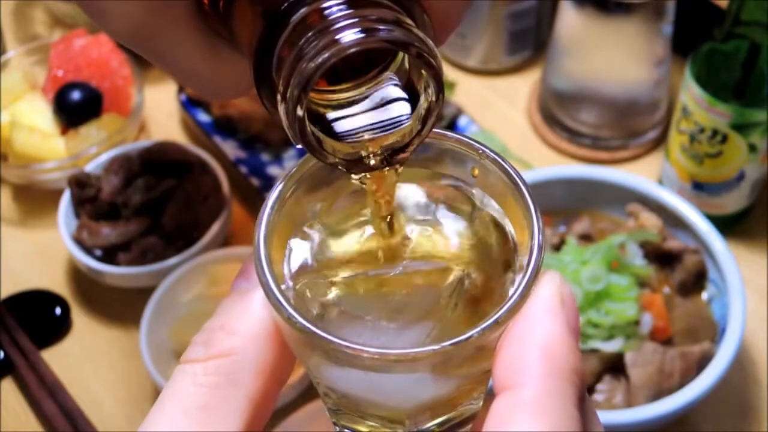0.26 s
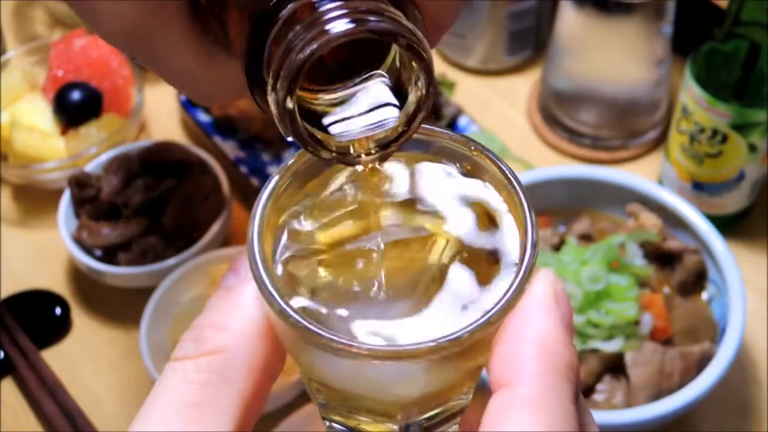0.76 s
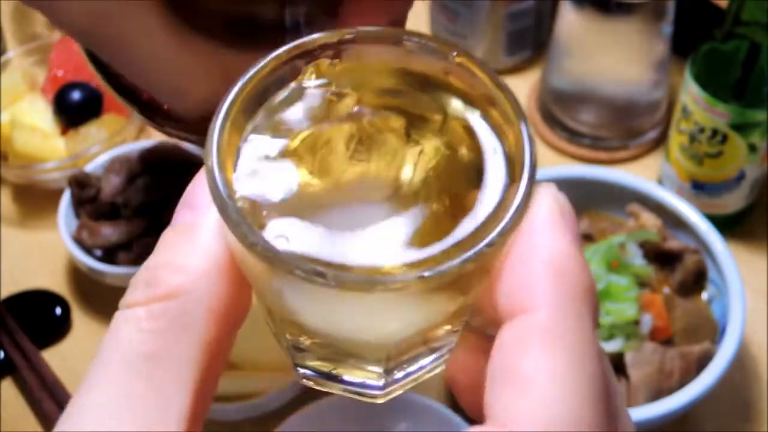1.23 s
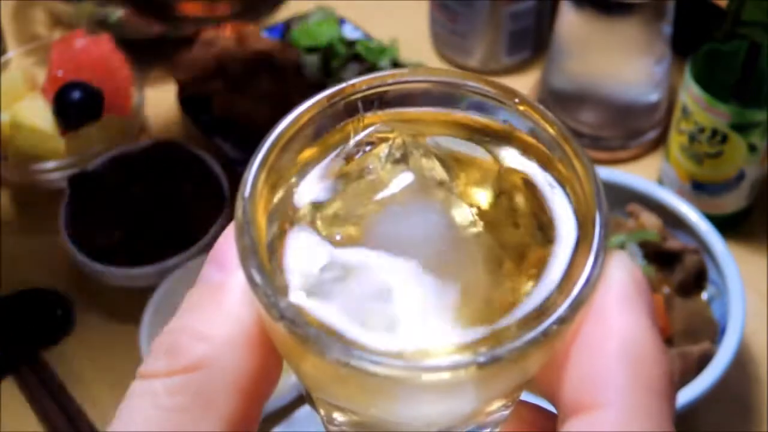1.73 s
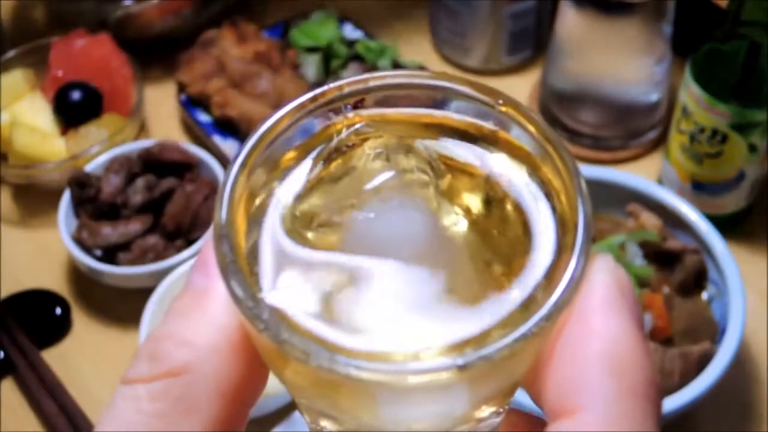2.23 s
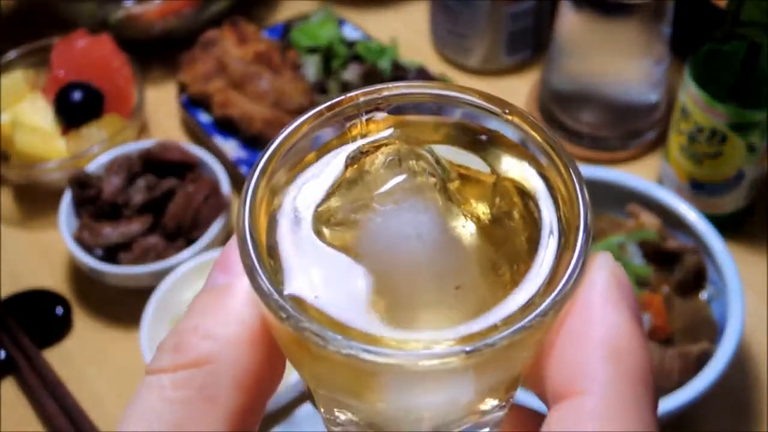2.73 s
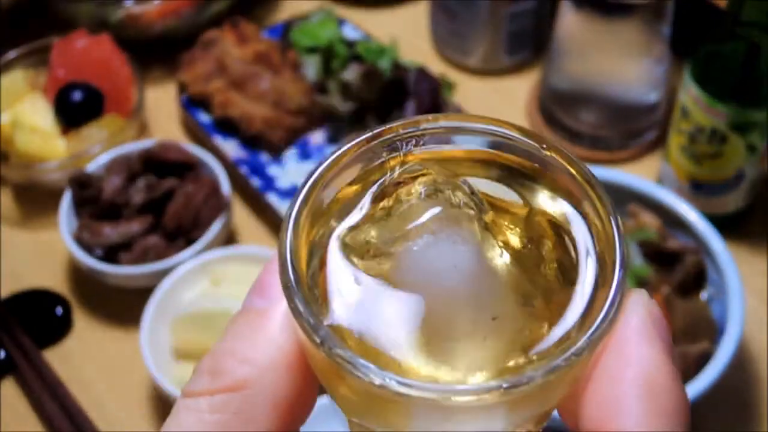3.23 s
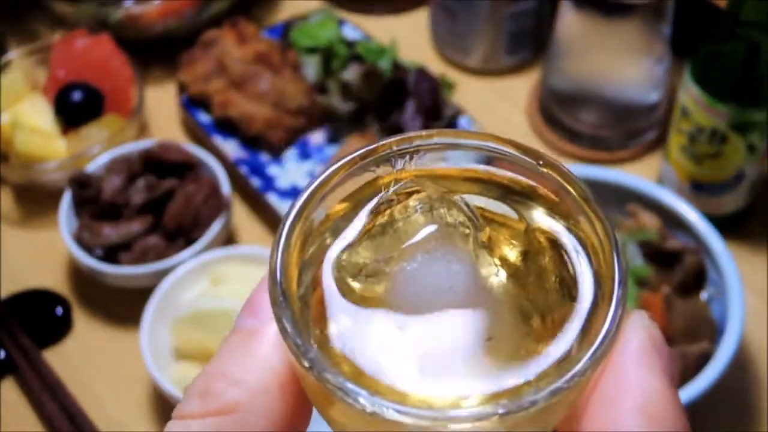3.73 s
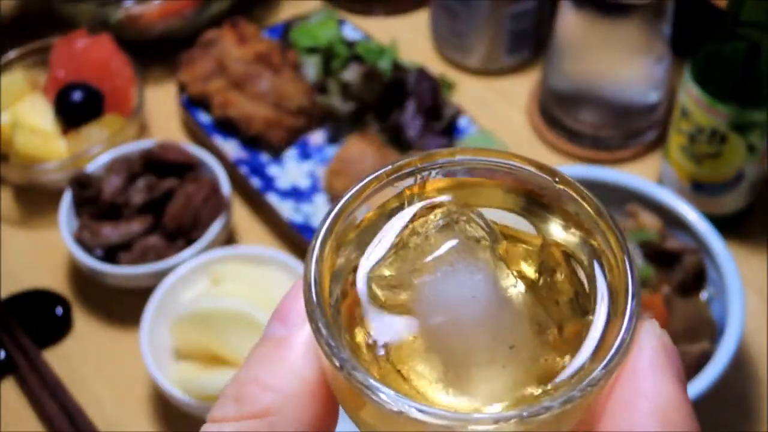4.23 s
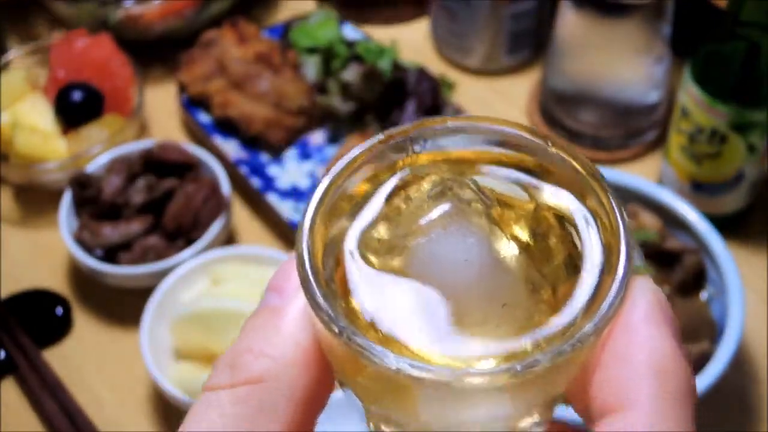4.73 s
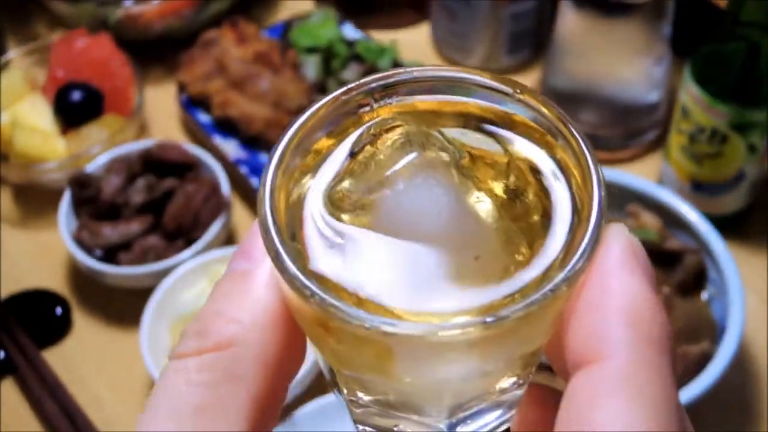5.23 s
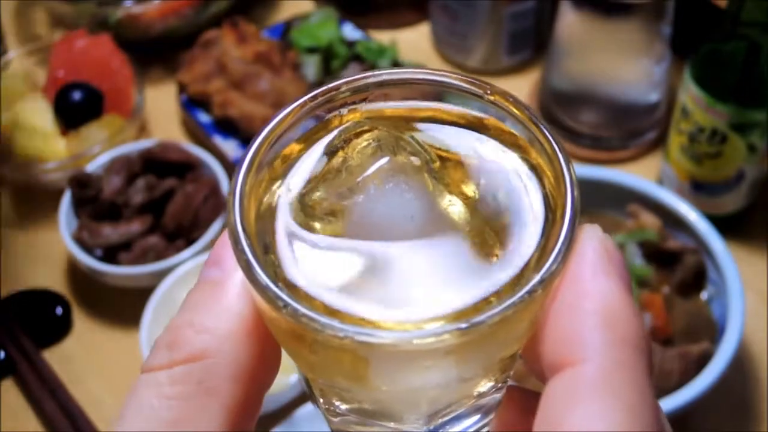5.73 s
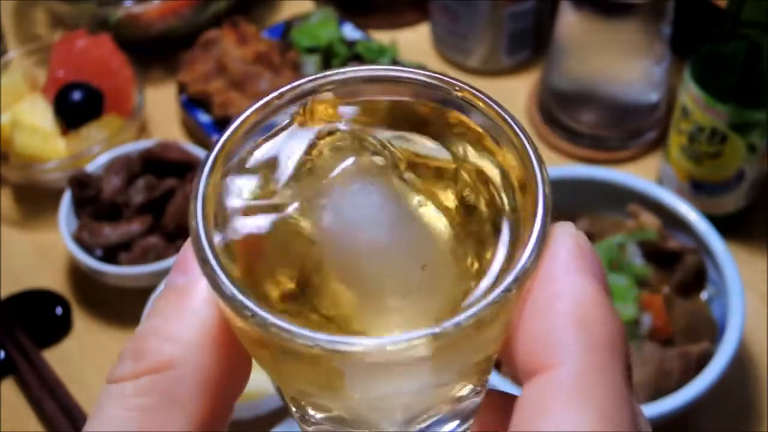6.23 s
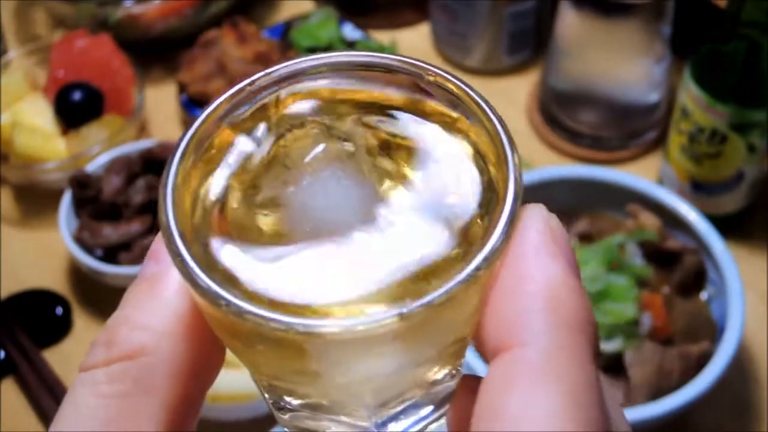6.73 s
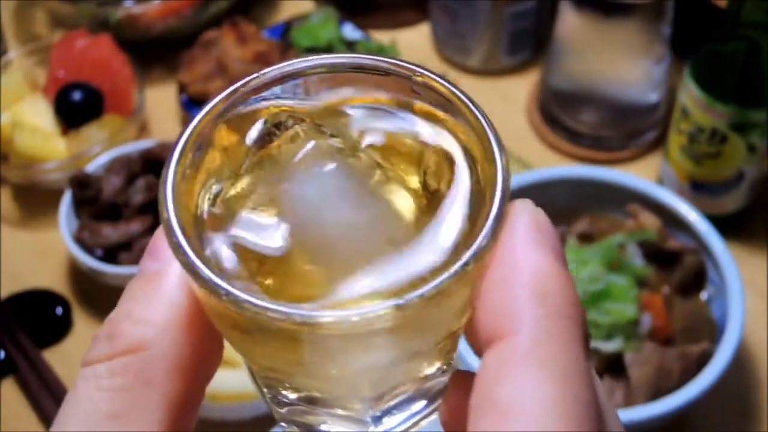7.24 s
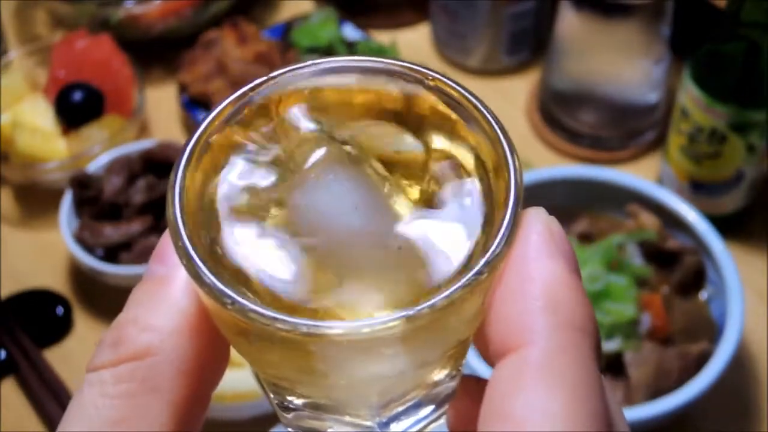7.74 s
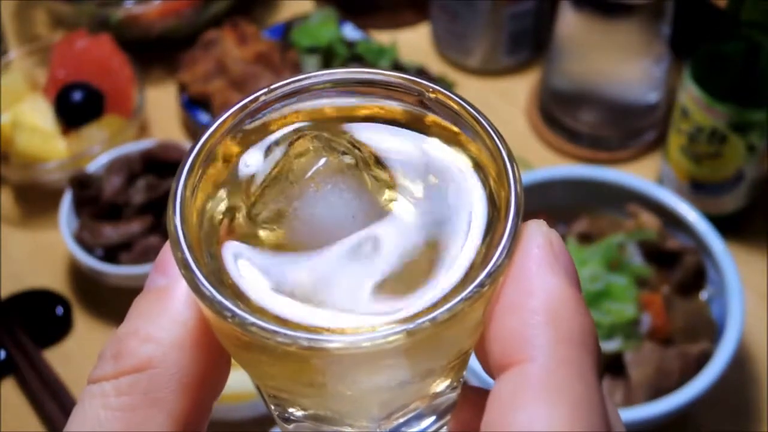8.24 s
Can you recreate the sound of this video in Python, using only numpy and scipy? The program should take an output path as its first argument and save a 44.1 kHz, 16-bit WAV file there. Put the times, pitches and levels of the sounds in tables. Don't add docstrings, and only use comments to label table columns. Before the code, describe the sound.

Three hollow glugs, a burst of bubbly pops, two heavy bottle knocks on wood with rattling dishes, cap screwing, then delicate ice ticks.

```python
import sys
import numpy as np
from scipy import signal
from scipy.fft import rfft, irfft, next_fast_len
from scipy.io import wavfile
from scipy.ndimage import uniform_filter1d

SR = 44100
rng = np.random.default_rng(int(sys.argv[2]) if len(sys.argv) > 2 else 0)


def master_out(mix):
    frames = np.transpose(np.atleast_2d(mix))
    ceiling = np.clip(frames, -1, 1)
    pcm = np.round(ceiling * 32767).astype(np.int16)
    wavfile.write(sys.argv[1], SR, pcm)


def linear_from_db(decibels):
    return 10 ** (np.asarray(decibels, float) / 20)


N = 373527


def at_hz(points, hz):
    table_hz, value = np.array(points).T[:2]
    return np.interp(np.log(hz + 1), np.log(table_hz), value)


def add(out, s, piece):
    i = round(s * SR)
    out[..., i:i + piece.shape[-1]] += piece[..., :N - i]


def fade(length, t60, swell):
    t = np.arange(round(length * SR)) / SR
    return t, (1 - np.exp(-t / max(swell, 1e-4))) * linear_from_db(-60 * t / max(t60, 1e-3))


def noise(size, spectrum, likeness, low_hz=0, high_hz=1e5):
    hz = np.fft.rfftfreq(size, 1 / SR)
    mid, side = rfft(rng.standard_normal((2, size)))
    alike = np.clip(at_hz(likeness, hz), 0, 1)
    pair = np.sqrt(1 + alike) * mid + np.sqrt(1 - alike) * side * [[1], [-1]]
    pair = linear_from_db(at_hz(spectrum, hz)) * pair
    pair /= np.sqrt(2 * np.mean(np.sum(np.abs(pair) ** 2, axis=1))) / size
    return irfft(pair * ((hz >= low_hz) & (hz < high_hz)), size)


def rings(rows):
    out = np.zeros(N)
    for s, hz, db, t60, swell in rows:
        t, shape = fade(0.33, t60, swell)
        add(out, s, -linear_from_db(db) * shape * np.sin(2 * np.pi * hz * t))
    return out


def climbs(rows, bend, change_db):
    out = np.zeros(N)
    for s, length, from_hz, to_hz, db in rows:
        share = np.arange(round(length * SR)) / (length * SR)
        phase = 2 * np.pi * np.cumsum(from_hz * (to_hz / from_hz) ** share ** bend) / SR
        ends = np.clip(np.minimum(share, 1 - share) / 0.021, 0, 1)
        add(out, s, linear_from_db(db + change_db * share) * ends * np.sin(phase))
    return out


def click(db, t60):
    shape = fade(.02, t60, 0.0001)[1]
    return linear_from_db(db) * shape * np.diff(rng.standard_normal(len(shape) + 1)) / 2


# [f/Hz, level/dB per Hz]
HISS_COLOUR = [(12, -4), (20, 1.5), (86, -6), (116, -4.5), (186, -8.5), (305, -7.5), (401, -11), (942, -13),
               (1270, -16.5), (1380, -17.5), (3730, -22), (6120, -24), (6830, -24), (7830, -25),
               (14400, -24.5)]
# [f/Hz, likeness 0..1]
HISS_LIKENESS = [(60, 0.73), (150, 0.56), (370, 0.293), (940, 0.42), (2340, 0.096), (5840, 0.03),
                 (14600, 0.018)]


def hiss():
    return linear_from_db(-50) * noise(next_fast_len(N), HISS_COLOUR, HISS_LIKENESS, 0, 14330)[:, :N]


def limiter_gain(x):
    limit, duck_db, look_ahead_s, ease_s, recover_db_per_s = .6, 28, 0.0092, 0.0097, 400
    climb = recover_db_per_s * np.arange(N) / SR
    held = np.maximum.accumulate(duck_db * (np.abs(x).max(axis=0) > limit) + climb) - climb
    ahead = np.roll(held, -round(look_ahead_s * SR))
    return linear_from_db(-uniform_filter1d(ahead, round(ease_s * SR)))


def room(x):
    t60_s, wall_cut_hz = 0.11, 4800
    size = next_fast_len(N + SR)
    w = 2 * np.pi * np.fft.rfftfreq(size)
    dull = 1 / (1 + 1j * w * SR / (2 * np.pi * wall_cut_hz))
    answer = []
    for side in rng.uniform(0.006, 0.014, (2, 8)) * SR:
        loops = [linear_from_db(-60 * lag / SR / t60_s) * dull * np.exp(-1j * w * lag) for lag in side]
        answer.append(sum((-1) ** k * g / (1 - g) for k, g in enumerate(loops)))
    return irfft(rfft(x, size) * np.array(answer), size)[:, :N]


# [f/Hz, likeness 0..1]
NEAR_LIKENESS = [(200, 1), (2000, 0.96), (6000, 0.79), (14000, 0.85)]
# [f/Hz, level/dB per Hz]
STREAM_COLOUR = [(30, -22), (60, -4), (100, 5), (160, -12), (400, -40)]
# [t/s, peak/dB]
THUDS = [
    (0.0, -57),
    (.116, -54.5),
    (.334, -51),
    (.556, -56),
    (.636, -63),
]


def stream():
    rise_db_per_s, fall_db_per_s = 170, 140
    t, out, shape = np.arange(SR) / SR, np.zeros((2, N)), 0
    for s, db in THUDS:
        shape = shape + linear_from_db(db + np.minimum(rise_db_per_s * (t - s), fall_db_per_s * (s - t)))
    add(out, 0, shape * noise(SR, STREAM_COLOUR, NEAR_LIKENESS))
    return out


def stroke(attack, hold, t60):
    t = np.arange(SR // 2) / SR
    return np.clip(t / attack, 0, 1) * linear_from_db(-60 * np.clip(t - attack - hold, 0, None) / t60)


# [f/Hz, level/dB per Hz]
BRUSH_COLOUR = [(59, -44), (100, -25), (155, 4.5), (443, -4), (797, -6.5), (5480, -10), (11200, -5.5),
                (14100, -4.5), (15000, -40)]
# [f/Hz, likeness 0..1]
BRUSH_LIKENESS = [(60, 0.41), (240, 0.68), (940, 1), (3690, 1), (14600, 0.11)]
# [t/s, attack/s, hold/s, level/dB, brightness/dB]
BRUSHES = [
    (6.631, 0.0032, 0.027, -42, 3),
    (6.775, 0.012, 0.018, -44.5, -12),
]


def brush():
    split_hz = 2000
    grain = linear_from_db(8.5 * uniform_filter1d(rng.standard_normal(SR), size=64))
    low = grain * noise(SR, BRUSH_COLOUR, NEAR_LIKENESS, 100, 660)
    middle = grain * noise(SR, BRUSH_COLOUR, BRUSH_LIKENESS, 600, 15500)
    high = grain * noise(SR, BRUSH_COLOUR, BRUSH_LIKENESS, 610, 15500)
    middle = signal.lfilter(*signal.butter(1, split_hz, fs=SR), middle)
    high = signal.lfilter(*signal.butter(1, split_hz, "high", fs=SR), high)
    # sound, level/dB, share of the brightness, t60/s
    parts = [(linear_from_db(5.5) * low, -7.5, -0.24, 0.63),
             (linear_from_db(6) * middle, 0, -0.16, 0.36),
             (linear_from_db(4) * high, -0.6, 1, 0.26)]
    out = np.zeros((2, N))
    for k, (s, attack, hold, db, bright_db) in enumerate(BRUSHES):
        for part, part_db, share, t60 in parts:
            shape = linear_from_db(db + part_db + share * bright_db) * stroke(attack, hold, t60)
            add(out, s, shape * part[:, k * SR // 2:][:, :len(shape)])
    return out


# [f/Hz, level/dB per Hz]
SHAKE_COLOUR = [(59, -38), (100, 0), (241, -9), (383, -7.5), (620, -2.5), (797, -2), (1190, -10.5),
                (11000, -23.5), (14100, -27), (15000, -67)]
# [f/Hz, t60/s]
SHAKE_DECAY = [(150, 0.3), (500, 0.29), (1500, 0.34), (4000, 0.16), (12000, 0.19)]
# [t/s, level/dB, swell/s, brightness/dB per octave]
SHAKES = [
    (3.241, -41.5, 0.0021, 0),
    (3.5363, -21, 0.0012, -1.04),
    (3.719, -45, 0.0033, -4.5),
    (3.765, -38, 0.028, 2.5),
    (3.782, -24.5, 0.0074, -2.5),
    (3.81, -57.5, 0.0022, 7),
    (3.900, -72.5, .001, 5.5),
    (3.961, -69, 0.00085, 5),
]


def shakes():
    crack_t60_s, crack_db, crack_low_hz = 0.03, 16.5, 1500
    out, edges = np.zeros((2, N)), 100 * 2 ** np.arange(0, 8, .5)
    for s, db, swell, tilt_db in SHAKES:
        crack = linear_from_db(crack_db) * fade(.35, crack_t60_s, swell)[1]
        for low, high in zip(edges, edges[1:]):
            tail = fade(.35, at_hz(SHAKE_DECAY, low), swell)[1]
            shape = tail + crack / (1 + (crack_low_hz / low) ** 2)
            gain = linear_from_db(db + tilt_db * np.log2(low / 1000))
            add(out, s, gain * shape * noise(len(tail), SHAKE_COLOUR, NEAR_LIKENESS, low, high))
    return out


# [t/s, f/Hz, peak/dB, t60/s, swell/s]
CHIMES = [(3.245, 2920, -50, 0.33, .008), (3.717, 5600, -59, 0.39, .002), (3.718, 10600, -62, 0.33, .002),
          (3.794, 3935, -37, 0.07, .003), (3.815, 7400, -51, 0.13, .002), (3.820, 10500, -55, 0.19, .002),
          (3.900, 10500, -58, .10, .001), (3.961, 11600, -59, .2, .001), (3.962, 6500, -56, .05, .001),
          (4.580, 3270, -56, .5, .02), (4.505, 6380, -64, 0.82, .03), (6.640, 8750, -50, .32, .015),
          (6.612, 1150, -34, 0.018, .002)]


def chimes():
    return rings(CHIMES)


# [t/s, length/s, from f/Hz, to f/Hz, start level/dB]
ROLL_ONS = [
    (3.2386, .0068, 286, 664, -26.5),
    (3.7144, .0070, 284, 654, -30.5),
]


def roll_ons():
    return climbs(ROLL_ONS, bend=1.36, change_db=9.5)


# [t/s, peak/dB, contact cut-off f/Hz, bass weight/dB]
EDGE_BLOWS = [(3.2413, -20.5, 300, -1.5), (3.2454, -19, 800, -8), (3.2560, -31, 500, 5),
              (3.4950, -41.5, 500, -2), (3.7174, -22, 300, -3), (3.7213, -24, 900, -9),
              (3.7268, -28.5, 400, 0), (3.7500, -32, 300, 3), (3.7608, -34, 200, 6),
              (5.3170, -37, 500, -1.5), (5.3280, -52, 300, -16)]
# [t/s, peak/dB, contact cut-off f/Hz, bass weight/dB]
BASE_BLOWS = [(3.5353, 9, 520, -6.5), (3.5388, 3.5, 3000, -6), (3.5415, -11, 3000, 10),
              (3.5439, 5, 597, -6), (3.5480, -5, 700, 6), (3.5570, -22, 1200, -5), (3.5720, -16, 1500, 0),
              (3.7820, -7.5, 3020, 6), (3.7870, -21, 2000, 0), (3.7930, -7, 2400, -8),
              (3.7975, -26, 900, -2), (3.8035, -11.5, 1990, -4.5), (3.8110, -28, 1500, 9),
              (3.8170, -23.5, 2200, -12), (3.8260, -22, 1800, -4), (3.8400, -28, 1500, -10)]
# [f/Hz, level/dB, t60/s]
EDGE_MODES = [(135, 7.5, 0.15), (160.4, -3.5, 0.25), (267, -1, 0.116), (318, 0, 0.07), (410, -10, 0.21),
              (550, 8.5, 0.072), (645.5, 5.5, 0.16), (850, -25, 0.121), (950, 3, 0.044), (1060, -9, .1),
              (1515, -12.5, .07), (2190, -7.5, .07), (2910, -6, .06)]
# [f/Hz, level/dB, t60/s]
BASE_MODES = [(120, -4.5, 0.2), (189, -13.5, .1), (250, -17, 0.076), (323, -16, .08), (389.5, -4.5, 0.12),
              (430, 1, 0.032), (514, -2, 0.055), (698, -2.5, 0.073), (777, -6, 0.032), (924, -9.5, 0.1095),
              (1020, -16, 0.13), (1240, -14, 0.08), (1325, -2.5, 0.024), (1550, -18, 0.12),
              (1660, -1, 0.05), (1980, -5, 0.029), (2200, -16, 0.0497), (2380, -5.5, 0.047),
              (2990, -10.5, 0.05), (3935, -13.5, 0.035)]


def table():
    spread_db, pressed_s, left_ringing = 2.2, 0.0073, 0.65
    out = np.zeros(N)
    for blows, modes in [(EDGE_BLOWS, EDGE_MODES), (BASE_BLOWS, BASE_MODES)]:
        for s, db, cut_hz, bass_db in blows:
            for hz, mode_db, t60 in modes:
                t, shape = fade(.3, t60, 0.00113)
                shape = shape * (left_ringing + np.exp(-t / pressed_s))
                strike_db = db + mode_db - 10 + spread_db * rng.normal() + bass_db * (hz < 220)
                gain = linear_from_db(strike_db) / (1 + (hz / cut_hz) ** 2)
                add(out, s, gain * shape * np.sin(2 * np.pi * hz * t))
    return out


def ring(x, hz, t60):
    r, w = linear_from_db(-60 / (t60 * SR)), 2 * np.pi * hz / SR
    return signal.lfilter([0, np.sin(w)], [1, -2 * r * np.cos(w), r * r], x + 1e-18)


# [f/Hz, level/dB per Hz]
RUB_COLOUR = [(120, -37), (200, -1.5), (405, 1.5), (980, 0.5), (1720, -11.5), (11200, -14), (14200, -13),
              (15000, -59)]
# [t/s, level/dB]
TURNING = [
    (4.2, -69),
    (4.346, -49),
    (4.498, -53),
    (4.71, -50.5),
    (4.926, -60.5),
    (5.45, -57),
]
# [f/Hz, level/dB per Hz]
CAP_COLOUR = [(300, -3), (1000, -4), (1900, -13), (2500, -5), (6000, -5), (12000, -9), (14200, -6),
              (15000, -41)]
# [t/s, peak/dB]
CAP_TICKS = [(4.309, -35.5), (4.7374, -44), (4.7432, -36), (4.7500, -37), (4.7707, -40), (4.785, -35.5),
             (4.8441, -28.5), (4.861, -36), (4.872, -42), (5.1716, -41), (5.2270, -34), (5.2300, -29),
             (5.2524, -28)]
# [f/Hz, level/dB, t60/s]
CAP_MODES = [(2430, 8.5, 0.047), (3050, 0, 0.053), (3830, -8, .04), (4270, -1, 0.038), (5800, -2, 0.04),
             (6380, 2, 0.094), (7800, -8, .04), (8740, -13, .05), (10500, -3, .05), (11700, 2, 0.05),
             (13500, -6, .05)]


def cap():
    turn_s, turn_db = np.array(TURNING).T
    t = turn_s[0] + np.arange(round((turn_s[-1] - turn_s[0]) * SR)) / SR
    ends = np.clip(np.minimum(t - t[0], t[-1] - t) / 0.0021, 0, 1)
    friction = linear_from_db(-3) * noise(2 * SR, RUB_COLOUR, NEAR_LIKENESS)[:, :len(t)]
    rub, ticks = np.zeros((2, N)), np.zeros((2, N))
    add(rub, t[0], friction * linear_from_db(np.interp(t, turn_s, turn_db)) * ends)
    for s, db in CAP_TICKS:
        shape = fade(0.13, 0.056, 0.00026)[1]
        add(ticks, s, linear_from_db(db - 9) * shape * noise(len(shape), CAP_COLOUR, NEAR_LIKENESS))
        add(ticks, s, click(db + 0.5, t60=0.0054))
    busy = (linear_from_db(-2) * rub + ticks)[:, 4 * SR:6 * SR]
    shell = sum(linear_from_db(db - 40.5) * ring(busy, hz, t60) for hz, db, t60 in CAP_MODES)
    add(ticks, 4, shell)
    return rub + ticks


# [t/s, ring peak/dB, f/Hz, click level/dB]
ICE = [(6.4113, -42.5, 6570, -47), (6.494, -33, 6760, -36.5), (6.513, -42, 6960, -52),
       (6.9117, -53, 7290, -65), (7.0594, -51, 6780, -59), (7.1167, -50, 6830, -58),
       (7.2, -51.5, 6900, -55), (7.2838, -42, 6860, -60), (7.3267, -46, 6880, -47),
       (7.3444, -54, 6800, -62), (7.4213, -56, 6800, -47), (7.447, -50, 6650, -51),
       (7.5176, -35, 6760, -43), (7.5343, -37.5, 6870, -47), (7.5444, -43, 6940, -60),
       (7.6671, -45, 6700, -59), (7.7329, -44, 6900, -54), (7.7377, -30, 6920, -44),
       (7.7519, -42, 6900, -58), (7.9448, -41, 6860, -57), (7.9652, -34.5, 6930, -45),
       (8.1679, -47, 6860, -60)]


def ice():
    out = np.zeros(N)
    for s, db, hz, click_db in ICE:
        t, shape = fade(.08, 0.018, .0001)
        add(out, s, linear_from_db(db - 1) * shape * np.sin(2 * np.pi * hz * t))
        bright = fade(.08, 0.0026, .0001)[1]
        add(out, s, linear_from_db(click_db + 7.5) * bright * np.sin(2 * np.pi * 8000 * t))
        add(out, s, linear_from_db(12) * click(click_db, t60=.004))
    return out


# [t/s, peak/dB]
SNAPS = [
    (0.1024, -45),
    (0.3132, -56),
    (0.5357, -55),
    (1.2236, -40),
    (1.319, -47),
    (1.3863, -49),
    (1.6202, -45),
]


def snaps():
    out = np.zeros(N)
    for s, db in SNAPS:
        add(out, s, click(db + 14.5, t60=0.012))
    return out


# [t/s, f/Hz, peak/dB]
BEADS = [(1.2000, 1550, -41), (1.2270, 5700, -44), (1.2330, 8100, -46), (1.3189, 8800, -40),
         (1.3191, 3600, -49), (1.3849, 3650, -27), (1.3851, 5580, -27.5), (1.385, 8270, -33),
         (1.6184, 3600, -40.5), (1.6186, 4580, -37), (2.0970, 2080, -39.5), (4.3980, 4550, -35.5)]


def beads():
    return rings([(*row, 0.014, 0.00024) for row in BEADS])


# [t/s, f/Hz, peak/dB]
HUMS = [
    (0.802, 1170, -57),
    (1.2300, 1325, -37),
    (1.2320, 560, -44),
    (1.2400, 860, -43),
    (1.3250, 650, -38.5),
    (1.325, 1027, -40),
    (1.3300, 823, -48),
    (1.3320, 1253, -46),
    (1.3861, 1930, -52),
    (1.5330, 925, -50),
]


def hums():
    slow = uniform_filter1d(uniform_filter1d(rng.standard_normal(N), size=220), size=220)
    flutter = linear_from_db(6 * slow / slow.std())
    return flutter * rings([(*row, 0.17, 0.0016) for row in HUMS])


# [t/s, length/s, from f/Hz, to f/Hz, start level/dB]
SPENT = [
    (1.2216, 0.0064, 2350, 2870, -28),
    (1.2272, 0.0068, 3050, 3400, -34),
    (1.2216, 0.015, 7740, 8600, -37),
    (1.222, 0.012, 9200, 11600, -34),
    (1.226, 0.026, 303, 524, -33),
    (1.4545, 0.019, 1020, 3160, -29.5),
]
# [t/s, length/s, from f/Hz, to f/Hz, start level/dB]
RISING = [
    (1.388, .068, 286, 764, -46.5),
    (1.572, .021, 655, 915, -56),
]


def bubbles():
    return climbs(RISING, bend=2.09, change_db=7.5) + climbs(SPENT, bend=0.74, change_db=-15)


# [t/s, f/Hz, peak/dB, t60/s, swell/s]
NECK_TONES = [
    (1.2229, 1293, -15, 0.046, 0.00075),
    (1.3866, 931, -15, 0.094, 0.0089),
    (1.4580, 916, -36, 0.18, .0021),
    (1.4586, 363, -40.5, 0.12, .0022),
    (1.461, 1930, -39.5, 0.18, 0.0017),
    (1.585, 888, -42.5, 0.14, 0.0046),
]


def neck_tones():
    return rings(NECK_TONES)


# [t/s, f/Hz, peak/dB]
POPS = [
    (1.221, 275, -24.5),
    (1.2217, 890, -12.5),
    (1.2218, 1980, -17),
    (1.2215, 700, -7),
    (1.3186, 657, -8.5),
    (1.3191, 1070, -11),
    (1.3848, 907, -7),
    (1.385, 2220, -28),
    (1.4560, 770, -14.5),
]
# [t/s, neck f/Hz, peak/dB, bubble climb/s, bubble level/dB]
GLUGS = [
    (0.1027, 1185, -23, 0.028, -38),
    (0.3137, 1192, -25.5, .023, -41),
    (0.536, 1200, -25, .016, -49),
]


def pops():
    cycles, longest_s, swell_cycles = 11.5, 0.029, 0.66
    rows = [(s, hz, db, min(cycles / hz, longest_s), swell_cycles / max(hz, 600)) for s, hz, db in POPS]
    rows += [(s, 1.7 * hz, db - 21, .006, .0002) for s, hz, db, _, _ in GLUGS]
    return uniform_filter1d(rings(rows), size=12)


def glugs():
    t60_s, swell_s = 0.074, 0.00034
    neck, climbing = [], []
    for s, hz, db, climb, bubble_db in GLUGS:
        neck.append((s, 1.02 * hz, db, t60_s, swell_s))
        neck.append((s, 2.96 * hz, 2 * bubble_db + 37.5, 0.015, swell_s))
        neck.append((s, .985 * hz, db - 16.5, 0.23, .006))
        neck.append((s + climb, hz, bubble_db + 10, t60_s, 0.00077))
        climbing.append((s, climb, .52 * hz, 0.94 * hz, bubble_db))
    return rings(neck) + climbs(climbing, bend=1.85, change_db=-8.5)


def scene():
    liquid = snaps() + beads() + hums() + bubbles() + neck_tones() + pops() + glugs() + ice()
    wood = table() + chimes() + roll_ons()
    walls = room(linear_from_db(-34) * wood + linear_from_db(-21) * liquid)
    close = liquid + wood + shakes() + cap() + brush() + walls
    close = signal.sosfilt(signal.butter(4, 84, "high", fs=SR, output="sos"), close)
    left_right = np.array([[1], [-1]])
    close = close * linear_from_db(0.25 * left_right)
    return (close + stream() + hiss() * limiter_gain(close)) * linear_from_db(0.13 * left_right)


def band_limit(x):
    return signal.sosfilt(signal.butter(12, 15180, fs=SR, output="sos"), x)


def record(dry):
    dull = signal.sosfilt(signal.cheby2(8, 40, 15120, fs=SR, output="sos"), dry)
    flat = dull / (1 + dull ** 8) ** (1 / 8)
    return band_limit(flat)


dry = scene()
out = record(dry)
master_out(out)
```